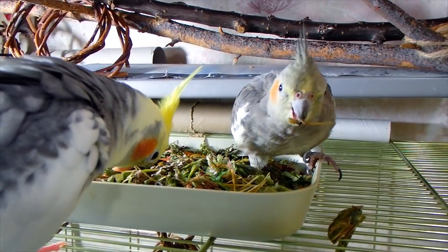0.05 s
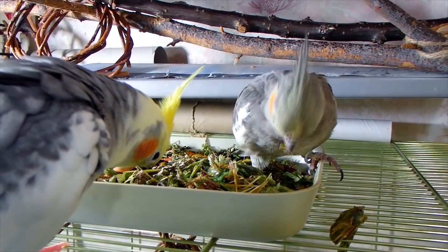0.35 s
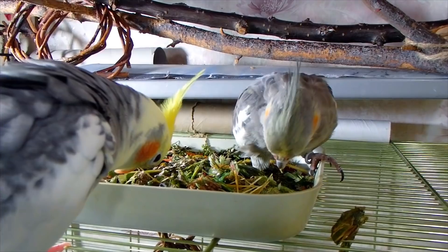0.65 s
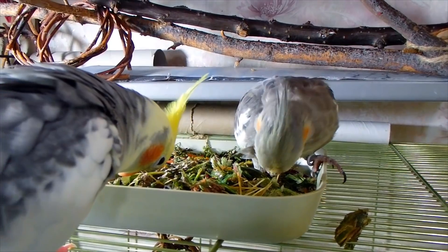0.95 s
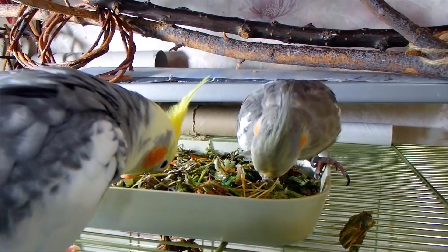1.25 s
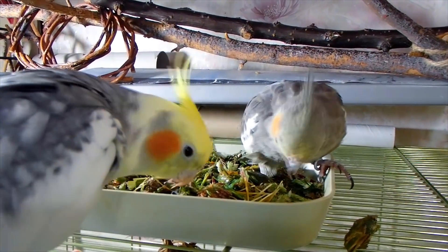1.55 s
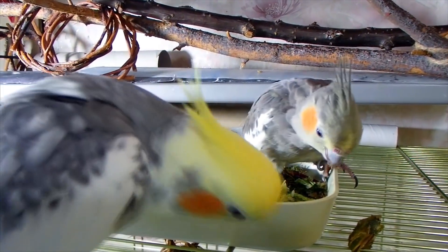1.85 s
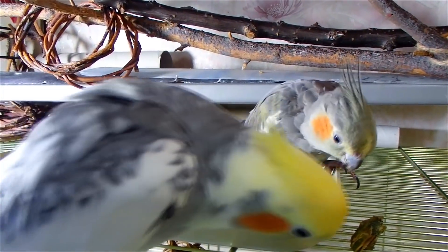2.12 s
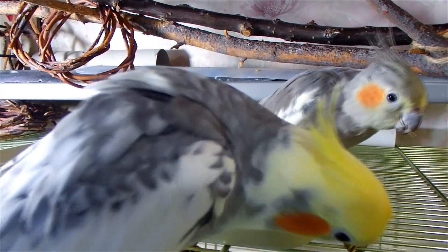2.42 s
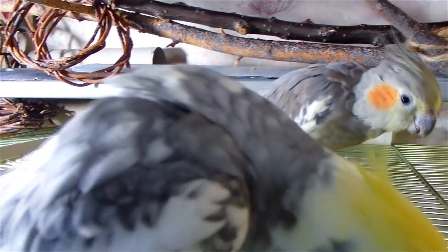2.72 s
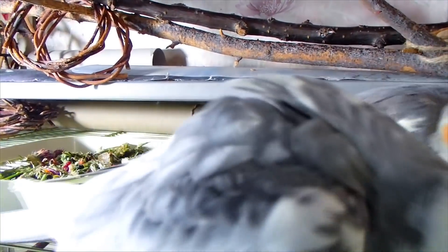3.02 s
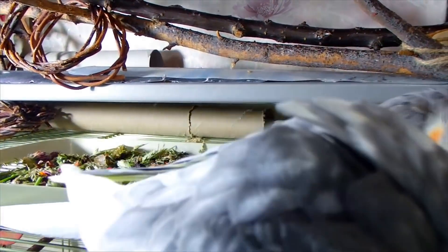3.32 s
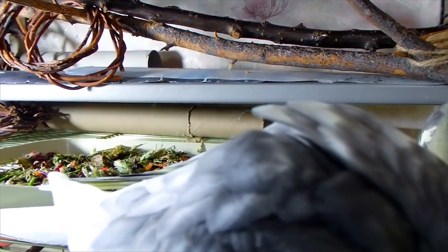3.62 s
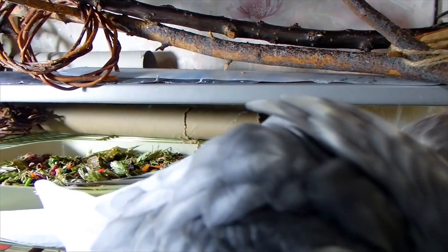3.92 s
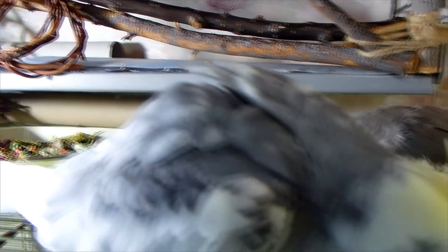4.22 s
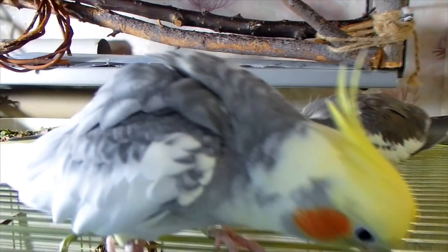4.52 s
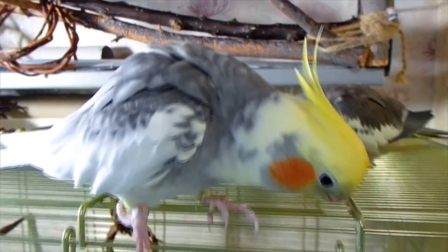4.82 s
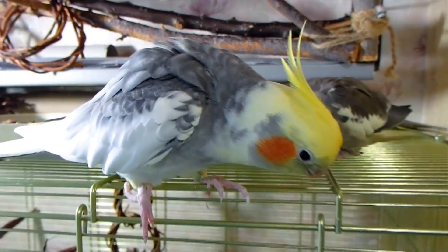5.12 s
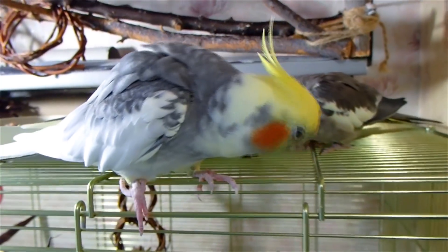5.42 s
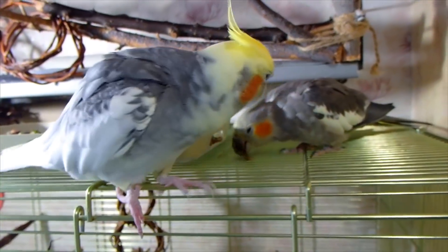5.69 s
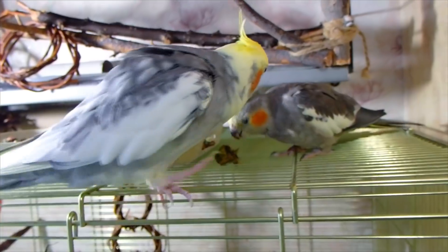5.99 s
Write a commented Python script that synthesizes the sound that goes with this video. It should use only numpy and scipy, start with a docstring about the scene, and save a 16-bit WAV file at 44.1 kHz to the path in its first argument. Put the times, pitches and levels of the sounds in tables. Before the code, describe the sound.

Cockatiels move about on top of a wire cage, heard close up in a quiet room with a soft rush of air. A thump and rustle set the cage ringing briefly, then one bird gives a fast run of clipped, raspy chirps, the loudest sound. Feathers and claws scuff and dry stalks crack. A brief pause follows, then thin, falling whistles, light footfalls and a couple of stray chirps.

```python
"""A small room hums with a soft rush of air, then thin, arching bird whistles come in.
Two cockatiels are feeding on top of a wire cage: feathers and claws scuff the wires, feet thump
and set the cage ringing, and dry stalks snap. One bird scolds in a run of short, harsh chirps.
Each drops in pitch and turns rough as every second pulse of its voice weakens (period doubling).
More whistles and a few stray chirps follow, all with a short room echo."""
import sys
import numpy as np
from scipy import signal
from scipy.fft import rfft, irfft, next_fast_len
from scipy.io import wavfile
from scipy.ndimage import uniform_filter1d

SR = 44100
rng = np.random.default_rng(int(sys.argv[2]) if len(sys.argv) > 2 else 0)


def persist_wave(psi):
    """Save psi, clipped to +-1, as 16-bit WAV."""
    counts = np.round(np.clip(psi, -1, 1) * 32767).astype(np.int16)
    wavfile.write(sys.argv[1], SR, np.atleast_2d(counts).T)


N = 271215
T = np.arange(N) / SR

# tone of the room's steady rush: frequency_hz, gain_db
AIR_TONE = [(20, -19.5), (40, -5), (70, 6), (170, -11), (270, -6), (420, -16), (500, -1.5), (880, -21.5),
            (1120, -25), (1500, -19.5), (1750, -29), (2900, -25.5), (3600, -18), (9000, -25), (15500, -38)]
# wavering bands on top of the rush: centre_hz, width_hz, gain_db
AIR_BANDS = [(691, 230, 5), (879, 137, 2), (1475, 70, -1)]
# how those bands swell and sink together: time_s, level_db
AIR_BANDS_LEVEL = [(0, -67), (.7, -68), (1.5, -65.5), (4.1, -64.5), (4.7, -63), (6.15, -63.5)]
# one list of points for each whistle: time_s, pitch_hz, level_db
WHISTLE_ARCHES = [
    [(1.05, 4300, -63), (1.19, 4097, -52.5), (1.34, 3975, -64.5), (1.45, 3610, -65.5), (1.52, 3230, -84)],
    [(1.03, 3340, -75), (1.14, 3390, -70), (1.18, 3300, -80)],
    [(3.44, 3790, -66), (3.58, 3640, -52.5), (3.76, 3260, -77)],
    [(5.36, 2520, -81.5), (5.44, 3620, -71.5)],
    [(5.41, 4130, -74), (5.468, 4480, -49), (5.535, 4830, -49), (5.62, 4655, -47.5), (5.69, 4370, -51.5),
     (5.76, 4343, -55), (5.84, 4320, -73)],
    [(5.8, 3423, -65), (5.865, 3346, -51.5), (5.925, 2990, -62), (6.02, 2870, -69)],
]
# feathers and claws scuffing: peak_s, rise_s, decay_s, level_db, centre_hz, wire_ring_db, shudder_db
SCUFFS = [(1.235, 0.0055, 0.059, -46.5, 3000, 2, -57), (1.268, 0.0061, 0.024, -39.5, 2800, 2.5, -37),
          (3.204, 0.0083, 0.042, -38.5, 5700, 9, -58), (3.324, .012, 0.082, -50.5, 4300, 13, -60),
          (3.37, .016, 0.077, -48.5, 6640, 22, -63), (3.421, .0076, 0.022, -39.5, 7000, 20, -63),
          (3.5, 0.022, 0.031, -54.5, 6000, 18, -55), (3.7, .014, 0.029, -57.5, 7160, 18, -72),
          (3.807, 0.0024, 0.039, -47, 4560, 28, -74)]
# where the thin wires ring: centre_hz, width_hz, gain_db
WIRE_RINGS = [(2153, 83, -1), (3420, 74, -10), (3920, 110, -8), (5010, 140, -6), (5745, 43, -6.5),
              (7210, 110, -12), (10460, 130, -15)]
# the rustle softens at the very top: frequency_hz, gain_db
RUSTLE_TONE = [(10500, 4.5), (15000, -2)]
# feet knocking on one part of the cage: start_s, cage_db, part_hz, part_db
FOOT_THUMPS = [(1.233, -65, 980, -37), (1.263, -32, 991, -30), (1.274, -23, 932, -33),
               (1.284, -34, 367.3, -36), (1.388, -34.5, 81, -47), (3.206, -46.5, 163, -51.5),
               (4.613, -72, 834, -48), (5.372, -45, 527, -46), (5.391, -55, 496, -45.5),
               (5.423, -62, 454, -43), (5.467, -61.5, 56.8, -43)]
# the notes of the whole cage: pitch_hz, gain_db, fade_60db_s
CAGE_NOTES = [(75.4, 0.5, 0.28), (108.3, -6, 0.45), (238.4, -2.5, 0.29), (385, -16.5, 0.24),
              (448, -20.5, 0.19), (817, -10.5, .2), (960, -7.5, .25)]
# scolding chirps (doubling runs from 0 to 1; throat_db and mouth_db are relative to the beak):
# start_s, length_s, level_db, doubling, throat_db, mouth_hz, mouth_db, beak_hz, hollow_hz
SCOLD_CHIRPS = [ (1.58, 0.01, -43.5, 0.26, 3, 4300, -5, 6180, 2850),
                (1.7208, .011, -24.5, 0.42, -6, 4750, -10, 5880, 2690),
                (1.8626, .016, -24.5, 0.71, -7, 4190, -3, 5630, 3650),
                (2.02, 0.02, -22.5, 0.46, -3.5, 4650, -2.5, 5650, 2560),
                (2.172, .038, -27, 0.23, 1.5, 3720, -4, 5130, 7700),
                (2.363, 0.016, -29.5, .72, -7, 4170, -6.5, 5220, 3330),
                (2.53, 0.015, -29, 0.25, -8.5, 4200, -5, 5190, 3320),
                (2.6886, 0.018, -26, .37, -2.5, 4130, -4.5, 5200, 2790),
                (2.8693, .011, -27, 0.33, -2.5, 4130, -1.5, 5260, 3130),
                (3.0487, 0.013, -24, 0.3, -1.5, 4750, 1, 5700, 3700),
                (3.227, .016, -27, 1, 0.5, 4040, -3.5, 5160, 2610),
                (3.4101, .012, -28.5, 0.4, -1, 4200, -3, 5500, 4900),
                (3.59, 0.017, -30, 0.99, 0.5, 4570, 0, 5360, 2990),
                (5.046, 0.014, -51, 0.69, 11, 4200, 1.5, 5750, 5110),
                (5.9895, .008, -40, 0.43, 16, 3930, -0.5, 4470, 3320),
                (6.132, 0.0081, -27.5, 0.37, -2, 4410, -9.5, 5500, 3800)]
# where the bird's throat rings: centre_hz, width_hz, gain_db
THROAT_RINGS = [(1296, 210, 2), (2090, 820, 3), (3175, 1460, 0.5)]
# how well the open beak sends out sound: frequency_hz, gain_db
BEAK_TONE = [(450, -12), (740, 5), (1120, -16.5), (1450, -0.5), (2000, -1), (6200, 1.5), (7100, -4.5),
             (7900, -8.5), (9000, -5.5), (10800, -16.5), (11900, -12), (13000, -25), (15000, -34.5)]
# where the scolding bird stands: time_s, left_minus_right_db
SCOLD_PAN = [(1.6, 2.5), (2.5, 1), (3.6, -2.5), (5.05, -7.5), (6, 2)]
# dry stalks snapping: peak_s, level_db, centre_hz
STALK_SNAPS = [(2.726, -42.5, 14300), (3.184, -45.5, 7100), (3.257, -30.5, 7050), (3.386, -36.5, 7750),
               (5.87, -50, 4480), (5.944, -45, 7000)]
# first echoes off the nearest hard surfaces: delay_s, gain
FIRST_ECHOES = [(.00048, 0.054), (.00135, 0.023), (.00205, .18)]
# how long the walls echo: frequency_hz, fade_60db_s
ROOM_FADE = [(250, 0.56), (1000, 0.26), (2500, 0.19), (6000, 0.14), (12000, 0.3)]
# how much the echoes differ between left and right: frequency_hz, side_db
ECHO_WIDTH = [(100, -6.5), (1500, -10.5), (4000, -4.5), (8000, -1.5)]


def undb(db):
    """Turn decibels into a gain."""
    return 10 ** (np.asarray(db) / 20)


def unit(x):
    """Scale a sound to an average (rms) level of 1."""
    return x / np.sqrt(np.mean(x ** 2) + 1e-20)


def pan(x, pan_db):
    """Make the left channel pan_db louder than the right."""
    return undb(np.array([[pan_db], [-pan_db]]) / 2) * x


def widen(mid, side):
    """Make stereo: add the side sound on the left, subtract it on the right."""
    return mid + side * np.array([[1], [-1]])


def add(out, start_s, x, pan_db):
    """Mix a sound into both channels from start_s on."""
    i = int(start_s * SR)
    x = x[..., :N - i]
    out[:, i:i + x.shape[-1]] += pan(x, pan_db)


def resonate(x, hz, width_hz):
    """Let through a band around hz; the narrower it is, the longer it rings."""
    hz = min(hz, .45 * SR)
    return signal.lfilter(*signal.iirpeak(hz, hz / min(width_hz, SR / 4), SR), x)


def colour(x, points):
    """Shape the tone along a curve of (frequency_hz, gain_db) points."""
    hz, db = np.transpose(points)
    size = 2 * next_fast_len(x.shape[-1])
    f = np.arange(size // 2 + 1) * SR / size
    gain = undb(np.interp(np.log(f + 1), np.log(hz), db))
    # folding the cepstrum keeps the filter from ringing before the sound starts
    cepstrum = irfft(np.log(gain))
    cepstrum[1:size // 2] *= 2
    cepstrum[size // 2 + 1:] = 0
    return irfft(rfft(x, size) * np.exp(rfft(cepstrum)))[..., :x.shape[-1]]


def wander(t, rate_hz):
    """Drift at random around zero, typically by about 1."""
    knots = rng.standard_normal(int(t[-1] * rate_hz) + 2)
    return np.interp(t * rate_hz, np.arange(len(knots)), knots)


def swell(t, rise_s, decay_s):
    """Grow for three rise times, then die away."""
    since_peak = t - 3 * rise_s
    return np.exp(np.minimum(since_peak / rise_s, -since_peak / decay_s))


def noise_band(samples, hz, width_hz):
    """Noise filtered twice to a band around hz."""
    return unit(resonate(resonate(rng.standard_normal(samples), hz, width_hz), hz, width_hz))


def room_air(steady_db=-67.5, side_db=-14, flutter_db=7):
    """A steady rush and hiss, with three low bands wavering on top."""
    mid, side = (undb(steady_db) * unit(colour(rng.standard_normal(N), AIR_TONE)) for _ in range(2))
    bands = sum(noise_band(N, hz, width) * undb(db + flutter_db * wander(T, 9.3))
                for hz, width, db in AIR_BANDS)
    bands = unit(bands) * undb(np.interp(T, *np.transpose(AIR_BANDS_LEVEL)))
    return pan(widen(mid + bands, undb(side_db) * side), pan_db=5)


def whistle(arch, hiss_db=-27, undertone_db=-27, smooth_s=0.05):
    """A thin, fluttering tone glides along, with a little breath and a hoarse trace an octave below."""
    times, hz, db = np.transpose(arch)
    t = np.arange(int((times[-1] - times[0]) * SR)) / SR
    glide = uniform_filter1d(np.interp(times[0] + t, times, hz), int(smooth_s * SR), mode="nearest")
    phase = 2 * np.pi * np.cumsum(glide * (1 + .007 * wander(t, 900))) / SR
    flutter = undb(2.5 * wander(t, 70)) * (1 + .5 * wander(t, 300))
    tone = unit(np.sin(phase) * flutter)
    undertone = unit(np.sin(phase / 2) * wander(t, 400))
    breath = unit(resonate(rng.standard_normal(len(t)), hz=4200, width_hz=3000))
    level = undb(np.interp(times[0] + t, times, db)) * signal.windows.tukey(len(t), .1)
    return level * (tone + undb(undertone_db) * undertone + undb(hiss_db) * breath)


def rustle(rise_s, decay_s, hz, wire_db):
    """A swell of tiny scrapes that catch and slip, and set the wires ringing."""
    t = np.arange(SR // 2) / SR
    grains = rng.standard_normal(len(t)) * undb(4.5 * wander(t, 1200) + 2.5 * wander(t, 220))
    grains = resonate(grains, hz, width_hz=0.84 * hz)
    wires = sum(undb(db) * resonate(grains, f, width) for f, width, db in WIRE_RINGS)
    scrape = resonate(grains, hz, width_hz=0.64 * hz)
    return unit(colour(scrape + undb(wire_db) * wires, RUSTLE_TONE)) * swell(t, rise_s, decay_s)


def wide_rustle(rise_s, decay_s, hz, wire_db, side_db=-9):
    """Scrapes come from all around the bird, so left and right differ a little."""
    mid, side = (rustle(rise_s, decay_s, hz, wire_db) for _ in range(2))
    return widen(mid, undb(side_db) * side)


def cage_shudder(rise_s, decay_s, linger=2.3):
    """The cage rattles low under scuffing feet, for longer than the scuff itself."""
    t = np.arange(SR // 2) / SR
    return noise_band(len(t), hz=270, width_hz=340) * swell(t, rise_s, linger * decay_s)


def foot_thump(cage_db, part_hz, part_db, push_s=0.0054, part_rise_s=0.0011, part_decay_s=0.024):
    """A soft push rings the whole cage; the part under the foot rings briefly."""
    t = np.arange(SR // 2) / SR
    push = t / push_s * np.exp(-t / (push_s / 8))
    ring = sum(undb(db - 60 * t / fade_s) * np.cos(2 * np.pi * hz * t) for hz, db, fade_s in CAGE_NOTES)
    cage = signal.fftconvolve(ring, push / push.sum())[:len(t)]
    wobbling_hz = part_hz * (1 + 0.084 * wander(t, 203))
    part = np.sin(2 * np.pi * np.cumsum(wobbling_hz) / SR)
    part_level = (1 - np.exp(-t / part_rise_s)) * np.exp(-t / part_decay_s)
    return undb(cage_db) * cage + undb(part_db) * part * part_level


def voice_box(t, length_s, start_hz, end_hz, doubling, jitter=.09, growl=.75, release_s=.0038):
    """The bird's voice box (syrinx) snaps open on a high note, then slackens and turns rough."""
    progress = np.minimum(t / length_s, 1)
    rough = doubling * np.interp(progress, [0, .6], [.45, 1.4])
    glide = end_hz + (start_hz - end_hz) * (1 - progress) ** 2.2
    # the harsher the call, the less even its pulses and the more breath in it
    hz = glide * (1 + jitter * np.sqrt(rough) * wander(t, 890))
    phase = 2 * np.pi * np.cumsum(hz) / SR
    harmonics = np.arange(1, 13)[:, None]
    pulses = unit(np.sum(np.cos(harmonics * phase) * (harmonics * hz < 15800), axis=0))
    # strong and weak pulses take turns, which adds a growl an octave below
    alternation = doubling * np.minimum(4 * progress, 2) * np.cos(phase / 2)
    pulses = pulses * (1 + alternation) + growl * doubling * alternation
    breath = rough * rng.standard_normal(len(t)) * (1 + np.cos(phase))
    release = np.exp(-np.maximum(t - 0.89 * length_s, 0) / release_s)
    pressure = np.interp(progress, [0, .4], [.65, 1]) * release
    return (pulses + breath) * pressure / np.hypot(1, rough)


def chirp(length_s, level_db, doubling, throat_db, mouth_hz, mouth_db, beak_hz, hollow_hz):
    """The voice rings the throat and mouth, then the opening beak; one band drops out, leaving a hollow."""
    t = np.arange(SR // 8) / SR
    usual_length_s, usual_db = 0.0172, -27.5
    # a longer chirp starts higher, ends lower and begins with the beak more nearly shut
    stretch = length_s / usual_length_s
    start_hz, end_hz = 2132 * stretch ** .28, 1369.5 * stretch ** -.12
    shut_db = -5.5 * stretch * (1 - np.minimum(t / length_s, 1))
    source = voice_box(t, length_s, start_hz, end_hz, doubling)
    throat = sum((-1) ** i * undb(db) * resonate(source, hz, width)
                 for i, (hz, width, db) in enumerate(THROAT_RINGS))
    mouth = resonate(source, mouth_hz, width_hz=340)
    beak = resonate(source * undb(shut_db), beak_hz, width_hz=340)
    voice = undb(throat_db) * unit(throat) + undb(mouth_db) * unit(mouth) + unit(beak)
    voice = voice - resonate(voice, hollow_hz, width_hz=420)
    call = unit(colour(voice, BEAK_TONE)) * np.sqrt(length_s / t[-1])
    treble_db = level_db - usual_db  # louder chirps are brighter
    return undb(level_db) * colour(call, [(6000, 0.0095), (9000, treble_db)])


def stalk_snap(rise_s, hz):
    """A dry stalk breaks under beak or claw: a very short rustle that rings the wires."""
    return wide_rustle(rise_s, 0.0061, hz, wire_db=11)


def bounce(x):
    """Add the first echoes, which boost some pitches and weaken others."""
    return x + sum(gain * np.array([np.interp(T - delay_s, T, channel, left=0) for channel in x])
                   for delay_s, gain in FIRST_ECHOES)


def room_echo(dry, near_db=-9, near_decay_s=0.02, tail_db=-12):
    """Echoes only: a quick cluster from cage and shelf, then a short tail from the walls."""
    t = np.arange(SR // 2) / SR
    hz, fades_s = np.transpose(ROOM_FADE)
    f = np.fft.rfftfreq(len(t), 1 / SR)
    spectrum = rfft(rng.standard_normal((2, len(t))))
    bands = (irfft(spectrum * np.interp(f, hz, share), len(t)) for share in np.eye(len(hz)))
    tail = sum(band * undb(-60 * t / fade_s) for band, fade_s in zip(bands, fades_s))
    tail *= np.minimum(t / 0.015, 1)
    spikes = rng.standard_normal((2, len(t))) ** 3
    near = spikes * np.exp(-t / near_decay_s) * np.minimum(t / .003, 1)
    mid, side = (undb(near_db) * unit(near) + undb(tail_db) * unit(tail)) / np.sqrt(len(t))
    return signal.fftconvolve(dry, widen(mid, colour(side, ECHO_WIDTH)), axes=1)[:, :N]


def scene(cage_pan_db=5, rustle_pan_db=-2, cage_echo_db=-5, snap_rise_s=0.002):
    """Place the birds and their cage in the room."""
    birds, cage = np.zeros((2, 2, N))
    for arch in WHISTLE_ARCHES:
        add(birds, arch[0][0], whistle(arch), pan_db=1)
    for peak_s, rise_s, decay_s, db, hz, wire_db, shudder_db in SCUFFS:
        start_s = peak_s - 3 * rise_s
        add(birds, start_s, undb(db) * wide_rustle(rise_s, decay_s, hz, wire_db), rustle_pan_db)
        add(cage, start_s, undb(shudder_db) * cage_shudder(rise_s, decay_s), cage_pan_db)
    for start_s, *knock in FOOT_THUMPS:
        add(cage, start_s, foot_thump(*knock), cage_pan_db)
    for start_s, *call in SCOLD_CHIRPS:
        add(birds, start_s, chirp(*call), pan_db=np.interp(start_s, *np.transpose(SCOLD_PAN)))
    for peak_s, db, hz in STALK_SNAPS:
        add(birds, peak_s - 3 * snap_rise_s, undb(db) * stalk_snap(snap_rise_s, hz), rustle_pan_db)
    birds = bounce(birds)
    # thin wires send little sound into the room, so the thumps stay close, with less echo
    return birds + cage + room_echo(birds + undb(cage_echo_db) * cage) + room_air()


def record(dry, top_hz=15800):
    """Cut off the very highest treble."""
    return signal.sosfilt(signal.ellip(10, .2, 70, top_hz, fs=SR, output="sos"), dry)


dry = scene()
out = record(dry)
persist_wave(out)
```